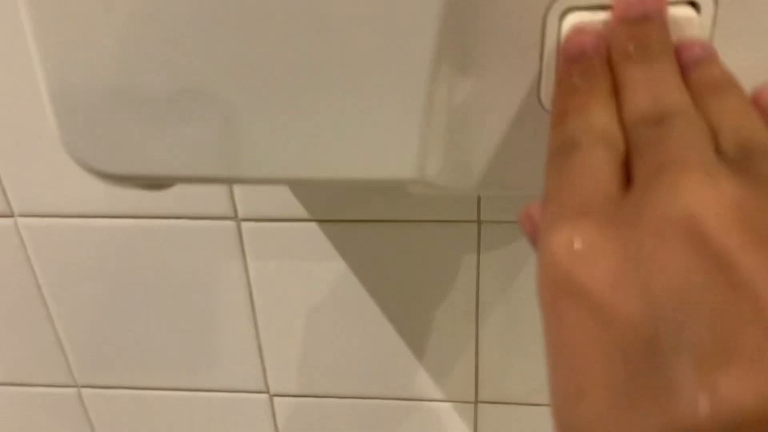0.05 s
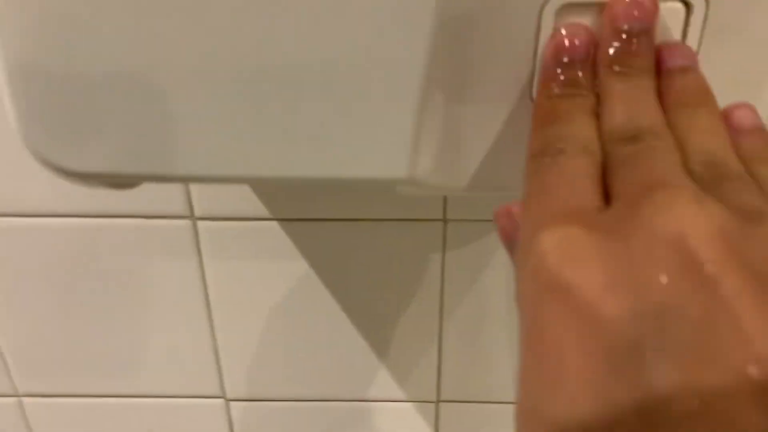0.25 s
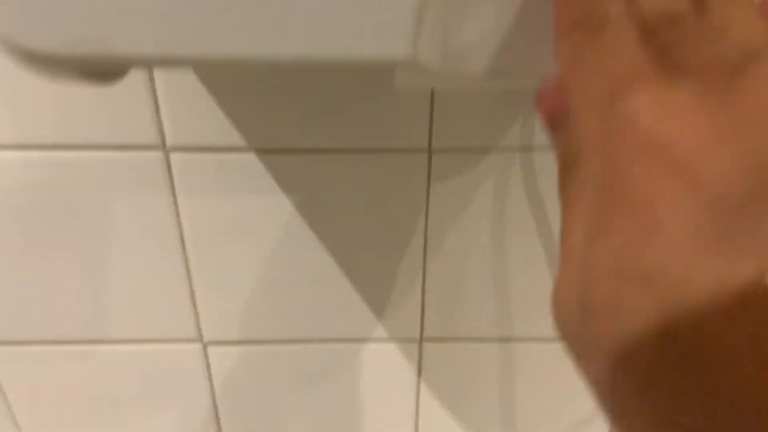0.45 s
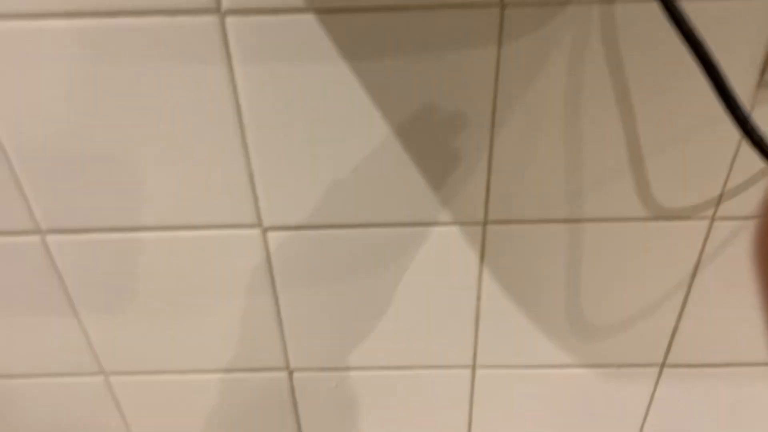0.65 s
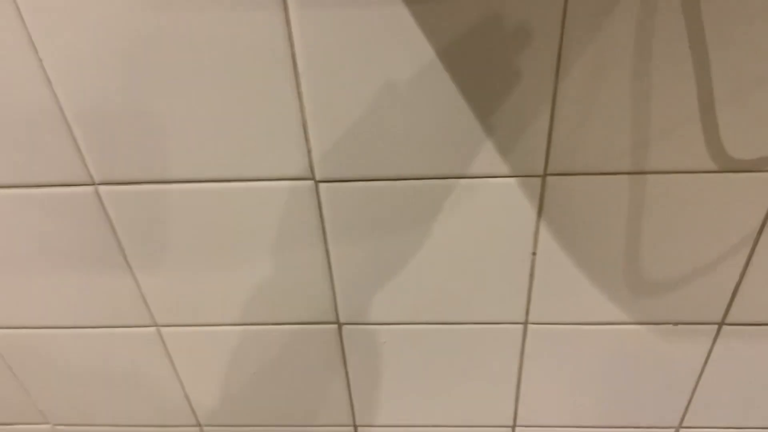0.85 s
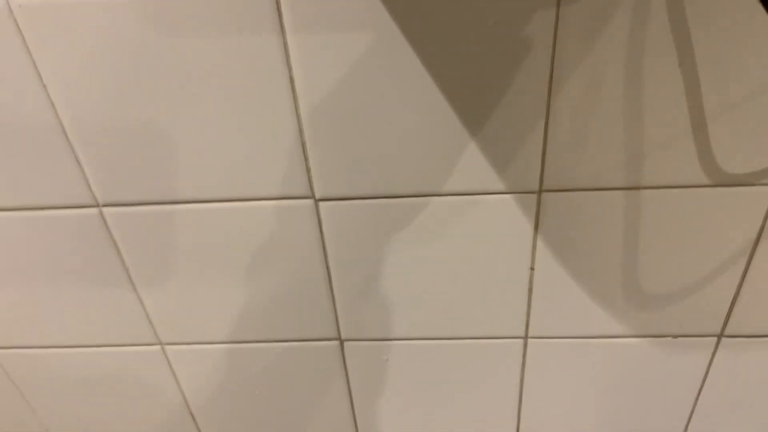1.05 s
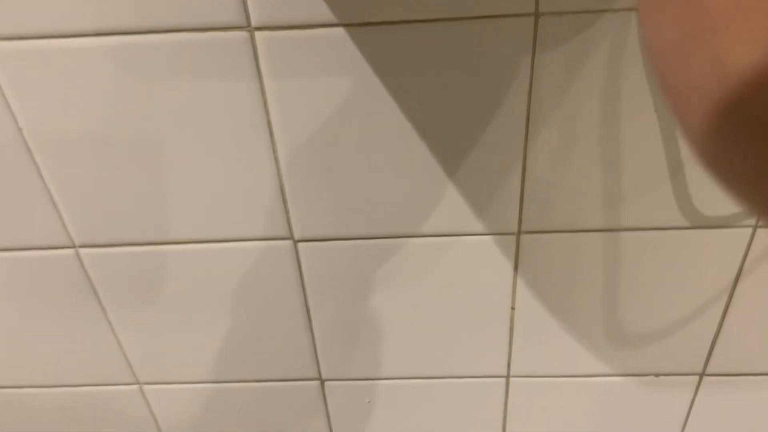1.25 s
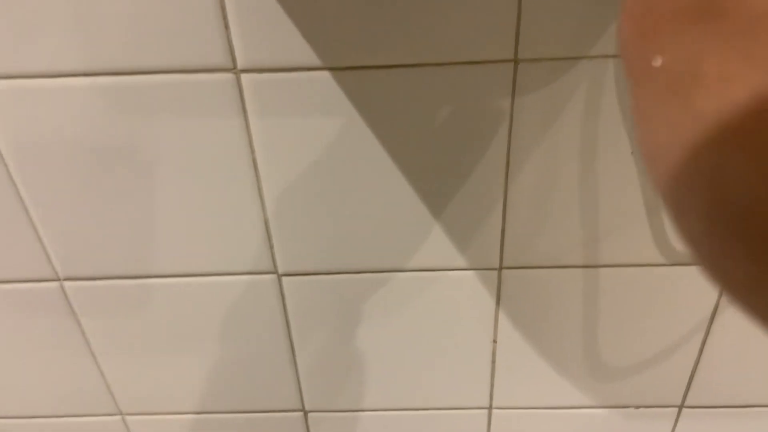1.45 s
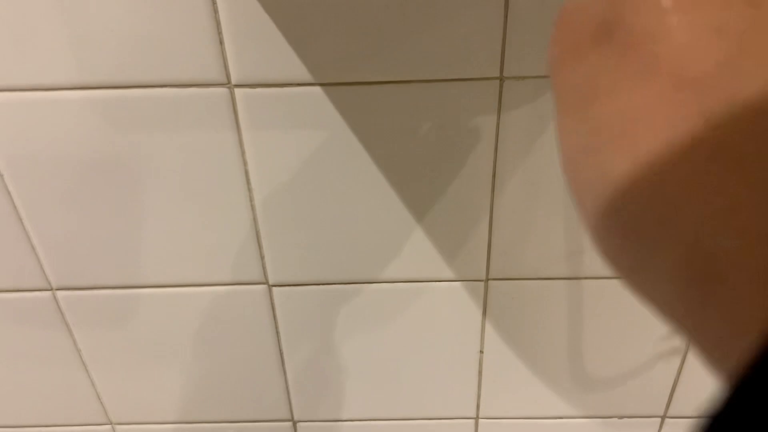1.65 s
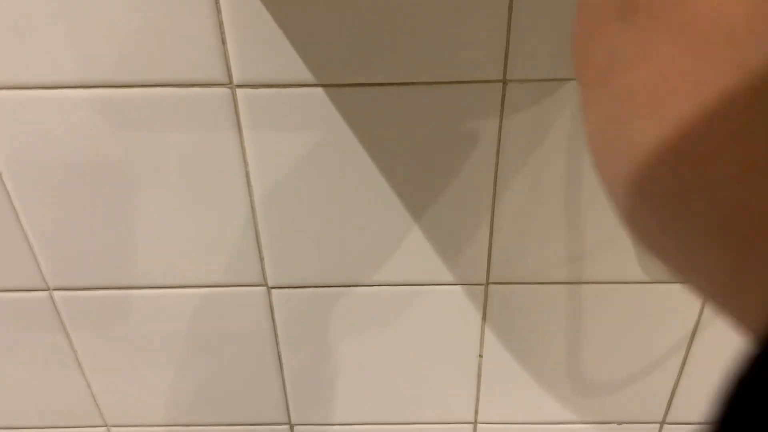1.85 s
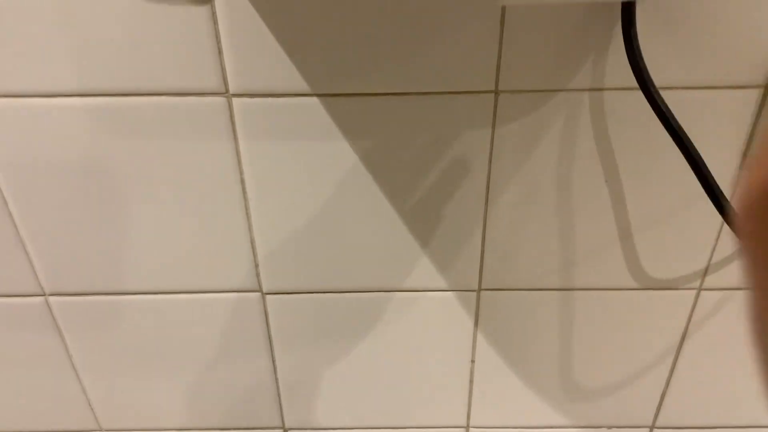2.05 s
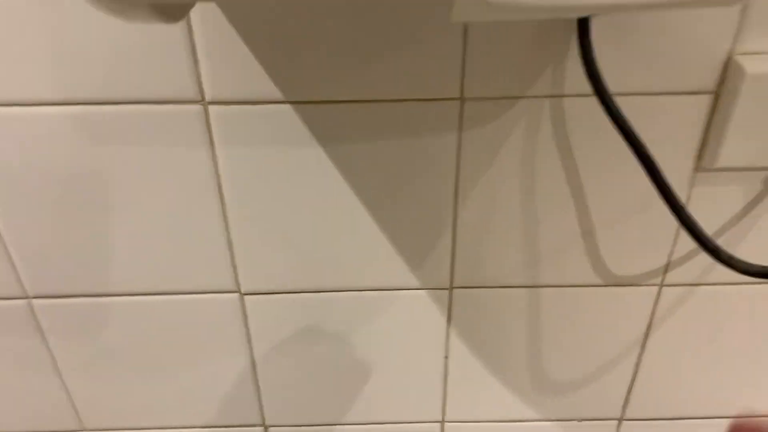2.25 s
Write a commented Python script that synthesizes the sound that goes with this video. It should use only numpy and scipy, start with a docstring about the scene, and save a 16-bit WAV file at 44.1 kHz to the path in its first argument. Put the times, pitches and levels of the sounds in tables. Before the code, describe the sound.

A wall switch clacks and snaps several times, pauses briefly, then clicks again in a quicker run. Fingers rub softly on the plastic over a low rumble. It is heard close up in a small, echoing tiled room.

```python
"""Fingers rub and tick on plastic over a low rumble; then a wall switch clacks and snaps, again and
again, close by in a small tiled room. The rocker strikes its hollow plate and the spring snaps over
brightly: each impact excites a crack, a dense rattle and the damped modes of the part. Sliding skin
makes a grainy hiss and one faint squeak. The tiles reverberate after every blow."""
import sys
import numpy as np
from scipy import signal
from scipy.fft import rfft, irfft
from scipy.io import wavfile
from scipy.ndimage import uniform_filter1d

SR = 44100
rng = np.random.default_rng(int(sys.argv[2]) if len(sys.argv) > 2 else 0)


def wav_out(sig):
    """Save sig, one row per channel (or a flat mono array), as 16-bit PCM at SR to the path in sys.argv[1]."""
    wavfile.write(sys.argv[1], SR, np.round(np.clip(np.atleast_2d(sig).T, -1, 1) * 32767).astype(np.int16))


N = 101429
BLOW_S = .005  # the level of a blow or tick is its energy spread over this time


def amp(db):
    """Amplitude ratio of a level in decibels."""
    return 10 ** (np.asarray(db) / 20)


def unit(x):
    """Normalisation to an rms of 1."""
    return x / np.sqrt(np.mean(x ** 2) + 1e-20)


def read(points, hz):
    """Interpolation on a logarithmic frequency axis."""
    f, value = np.transpose(points)
    return np.interp(np.log(hz + 1), np.log(f + 1), value)


def level(points):
    """Amplitude envelope from (time [s], level [dB]) points."""
    return amp(np.interp(np.arange(N) / SR, *np.transpose(points)))


def add(mix, s, sound):
    """Superposition: a stereo sound joins the mix at time s."""
    part = mix[:, max(round(s * SR), 0):][:, :sound.shape[1]]
    part += sound[:, :part.shape[1]]


def colour(x, points):
    """Minimum-phase filtering by a (frequency [Hz], gain [dB]) curve."""
    log_gain = np.log(amp(read(points, abs(np.fft.fftfreq(8192, 1 / SR)))))
    taps = np.fft.ifft(np.exp(np.conj(signal.hilbert(log_gain)))).real[:4096]
    return signal.fftconvolve(x, taps[None], axes=1)[:, :x.shape[1]]


def stereo_hiss(size):
    """Partial correlation: stereo hiss, centred in the bass and top treble, wide in between."""
    # how centred the hiss sounds: (frequency [Hz], left-right correlation [ratio])
    centring = [(20, .98), (300, .93), (500, .75), (800, .4), (1300, .1), (6000, .15), (9000, .3),
                (12000, .88), (16000, .93)]
    a, b = rfft(rng.standard_normal((2, size)))
    same = read(centring, np.fft.rfftfreq(size, 1 / SR))
    return irfft(np.array([a, same * a + np.sqrt(1 - same ** 2) * b]), size)


def direct(x, late_share=.72, lag_samples=4):
    """Path difference: most of a near sound reaches the right port later than the left."""
    delayed = np.pad(x, (lag_samples, 0))[:len(x)]
    return np.array([x, late_share * delayed + (1 - late_share) * x])


def dying(t60s, size):
    """Frequency-dependent damping: each band of a stereo noise falls 60 dB in its own T60."""
    hz, t, spectra = signal.stft(stereo_hiss(size), SR, nperseg=128)
    fade = amp(-60 * t / np.maximum(read(t60s, hz), .002)[:, None])
    return signal.istft(spectra * fade, SR, nperseg=128)[1][:, :size]


def ring(modes, size, detune=0, build_cycles=.88):
    """Free vibration: each mode is a damped sine that builds up over its first cycles."""
    t = np.arange(size) / SR
    return sum(amp(db - 60 * t / t60) * (1 - np.exp(-t * hz / build_cycles))
               * np.sin(2 * np.pi * hz * (1 + detune * rng.normal()) * t) for hz, db, t60 in modes)


def rumble(hum_hz=48.8):
    """Amplitude modulation: low rumble and hum, with a soft handling thump near 1.5 s."""
    # noise spectrum: (frequency [Hz], relative density [dB])
    spectrum = [(20, -52.5), (32, -20), (48, 4), (68, -5.5), (90, -5.5), (108, -20.5), (130, -10),
                (155, -16.5), (210, -10.5), (260, -35.5), (340, -28), (480, -32), (1000, -44.5),
                (2500, -58), (6000, -66), (8500, -57.5), (11000, -85), (16000, -76)]
    # level of rumble and hum, peaking at the thump: (time [s], gain [dB])
    envelope = [(0, 5), (.28, -3.5), (.42, 1.5), (.6, -1.5), (1.0, 0.5), (1.3, 1), (1.44, 6.5), (1.56, 6.5),
                (1.75, 4), (2.0, -1), (2.3, 1.5)]
    noise = irfft(rfft(stereo_hiss(N)) * amp(read(spectrum, np.fft.rfftfreq(N, 1 / SR))), N)
    hum = amp(-38) * np.sin(2 * np.pi * (hum_hz * np.arange(N) / SR + rng.random()))
    return level(envelope) * (amp(-35) * unit(noise) + hum)


def room(x, first_echo_s=.0018, early_t60_s=.21):
    """Reverberation: convolution with early reflections, a long tail and standing waves."""
    # decay of the tail: (frequency [Hz], T60 [s])
    tail_t60 = [(150, 1.56), (400, 0.78), (1000, 0.96), (2700, 0.8745), (5500, 0.65), (8500, 0.5857),
                (12000, 0.4), (16000, 2.41)]
    # spectrum of the tail: (frequency [Hz], gain [dB])
    tail_colour = [(100, -3), (300, -4.5), (500, 2), (800, -11), (1300, -11.5), (2500, -2), (4200, -9),
                   (5900, -5.5), (8300, -8), (12000, -10.5), (16000, -20.5)]
    # early echoes, thin in the bass: (frequency [Hz], gain [dB])
    early_colour = [(100, -18), (330, -13.5), (700, -2), (1500, -1), (4000, -2), (16000, 0.5)]
    # standing waves: (frequency [Hz], level [dB], T60 [s])
    modes = [(152.6, -70, 0.99), (213.2, -58, 0.67), (313.8, -53, 0.23), (335.8, -65, 0.84),
             (366.4, -64, 0.89), (389, -69.5, 2.1), (513.2, -69, 0.21), (786, -72.5, 0.69)]
    # treble loss of the whole response: (frequency [Hz], gain [dB])
    treble = [(100, 1), (11000, 0), (13500, -3.5), (15000, -10), (16000, -2.5)]
    onset = np.clip(np.arange(SR) / SR / first_echo_s - 1, 0, 1)
    tail = unit(dying(tail_t60, SR) * onset) / np.sqrt(SR)
    early = unit(dying([(1, early_t60_s)], SR) * onset) / np.sqrt(SR)
    response = colour(tail, tail_colour) + amp(-4.5) * colour(early, early_colour) + ring(modes, SR)
    return signal.fftconvolve(x, colour(response, treble), axes=1)[:, :N]


def rub(grain_db=4.0, grains_per_s=600):
    """Sliding friction of skin on plastic: a soft hiss with fine random impulses in it."""
    # strength of the rubbing: (time [s], level [dB])
    envelope = [(0, -35.5), (.08, -41.5), (.15, -39.5), (.19, -44.5), (.24, -30), (.33, -33), (.6, -48.5),
                (1.14, -77.5), (1.16, -54.5), (1.2, -32.5), (1.26, -36), (1.42, -45), (1.5, -45.5),
                (1.7, -43.5), (1.88, -35), (2.05, -62), (2.3, -50)]
    # friction spectrum: (frequency [Hz], relative level [dB])
    spectrum = [(100, -21.5), (330, 19.5), (500, 4.5), (1200, 0.5), (2200, -7.5), (4000, -12.5),
                (6000, -14.5), (8500, -7.5), (12000, -26.5), (16000, -36)]
    contacts = rng.random(N) < grains_per_s / SR
    strength = amp(grain_db * np.minimum(rng.exponential(1, N), 4))
    grains = contacts * strength * rng.choice([-1, 1], N)
    friction = unit(stereo_hiss(N)) + .54 * unit(direct(grains))
    return level(envelope) * unit(colour(friction, spectrum))


def squeak(length_s=.125, hz=3063, db=-55, rise_s=.008, fade_db_per_s=110):
    """Friction tone: a thin pitch and its octave waver and fade as the rub eases."""
    t = np.arange(0, length_s, 1 / SR)
    wobble, flutter = unit(uniform_filter1d(rng.standard_normal((2, N)), size=200))[:, :len(t)]
    phase = 2 * np.pi * np.cumsum(hz * (1 + .008 * wobble)) / SR
    tone = (np.sin(phase) + amp(-10) * np.sin(2 * phase)) * (1 + .3 * flutter)
    return direct(tone * np.minimum(t / rise_s, 1) * amp(db - fade_db_per_s * t))


def ticks(t60_s=.012, width_octaves=.25, skirt_db=-19):
    """Heavily damped resonance: each light touch is a noise burst with one broad spectral peak."""
    # fingers and plastic touch: (time [s], level [dB], centre frequency [Hz])
    touches = [(0.15, -44, 3400), (0.177, -42, 7700), (0.228, -38, 11800), (.2415, -39, 11900),
               (0.251, -28, 11500), (.905, -61.5, 4500), (.933, -68, 5000), (1.026, -58, 7840),
               (1.027, -56, 4080), (1.183, -38, 4000), (1.1847, -35.5, 10500), (1.1968, -37, 4000),
               (1.433, -43, 9600), (1.4415, -40.5, 8150), (1.448, -44, 10700), (1.4569, -33, 8150),
               (1.463, -38, 9800), (1.4651, -39.5, 4470), (1.5113, -24.5, 9300), (1.5125, -34, 4250)]
    out, hz = np.zeros((2, N)), np.geomspace(200, 16000, 40)
    for s, db, centre_hz in touches:
        peak = np.exp(-.5 * (np.log2(hz / centre_hz) / width_octaves) ** 2) + amp(skirt_db)
        burst = dying([(centre_hz, t60_s)], size=1024)
        tick = colour(burst, list(zip(hz, 20 * np.log10(peak))))
        add(out, s, amp(db) * tick * np.sqrt(BLOW_S * SR / np.sum(tick ** 2)))
    return out


def weighted(x, band_db):
    """Spectral weighting: a blow's energy in each of six bands is brought towards a given level."""
    # thud, knock, crack, ring, fizz and air bands: (centre frequency [Hz])
    centres = [280, 1100, 3500, 5900, 8800, 13000]
    # limits of those bands: (frequency [Hz])
    edges = [120, 480, 2200, 5000, 7200, 11000, 16000]
    power, hz = (abs(rfft(x)) ** 2).mean(0), np.fft.rfftfreq(x.shape[1], 1 / SR)
    energy = np.histogram(hz, edges, weights=power)[0] * 2 / x.shape[1]
    gain_db = np.array(band_db) - 10 * np.log10(energy / (BLOW_S * SR))
    return colour(x, list(zip(centres, gain_db)))


def blows(impacts, modes, spectrum, t60s, crack_db, rise_s, detune):
    """Impact excitation: each blow is a sharp crack, a dense short rattle and the part's modes."""
    out, size = np.zeros((2, N)), SR // 5
    t = np.arange(size) / SR
    crack = amp(crack_db) * direct(signal.unit_impulse(size))
    for s, *band_db in impacts:
        rattle = dying(t60s, size) * (1 - np.exp(-t / rise_s))
        blow = colour(crack + rattle, spectrum) + direct(ring(modes, size, detune))
        add(out, s, weighted(blow, band_db))
    return out


def plate_clacks():
    """Plate vibration: the rocker or a finger strikes the hollow plate and excites its modes."""
    # strikes: (time [s], level [dB] in each band: thud, knock, crack, ring, fizz, air)
    impacts = [(.193, -18.5, -48, -39.5, -54, -67, -63), (.213, -19, -43, -39, -55, -54, -69.5),
               (.2508, -18, -17.5, -26.5, -34, -23, -42), (.2735, -12, -24.5, -40, -23, -31, -42.5),
               (.437, -26, -33, -44, -46, -74, -66), (.4675, -37, -16, -22.5, -57, -26.5, -31.5),
               (.4738, -8, -14.5, -27, -36, -34.5, -54), (1.154, -28, -47, -77, -72, -80, -82),
               (1.2078, -12.5, -20, -24, -24.5, -39.5, -33.5), (1.2112, -16.5, -32.5, -29, -27, -30, -33),
               (1.477, -28.5, -35, -46.5, -50, -44, -58), (1.526, -48, -32.5, -35.5, -56, -60, -58),
               (1.597, -25.5, -36, -32, -58, -58, -54), (1.6055, -20, -32, -35.5, -24.5, -33, -40),
               (1.792, -15, -29, -35, -45, -58, -74), (1.8033, -13.5, -21.5, -20.5, -23, -21, -36),
               (1.875, -20.5, -34, -65, -62, -68, -49), (1.938, -7.5, -19, -28.5, -37, -43, -30.5),
               (2.145, -33.5, -41, -68, -76, -83, -88)]
    # plate modes: (frequency [Hz], relative level [dB], T60 [s])
    modes = [(171.3, -17, 0.11), (245.6, -10.5, 0.056), (300.4, -13.5, 0.1), (339.2, -5.5, 0.058),
             (380.7, -19.5, 0.073), (502.5, -13.5, 0.072), (827.5, -12, 0.14), (1125.3, -5, 0.11),
             (1290, -6, 0.035), (1378, -5, 0.036), (1538, -12, 0.029), (1780, -20.5, 0.029),
             (4540, -7, 0.0075), (5570, -28.5, 0.09), (5960, -14.5, 0.031)]
    # spectrum of crack and rattle: (frequency [Hz], gain [dB])
    spectrum = [(100, -28), (300, -8), (700, 13.5), (1300, 17.5), (2100, 1), (3500, -6), (6000, -3),
                (9000, -6.5), (12500, -9.5), (16000, -17.5)]
    # decay of the rattle: (frequency [Hz], T60 [s])
    t60s = [(200, 0.027), (1200, 0.024), (3000, 0.03), (6000, 0.0082), (14000, .014)]
    return blows(impacts, modes, spectrum, t60s, crack_db=16, rise_s=.0005, detune=.012)


def spring_snaps():
    """Snap-through: the spring flips over and releases its elastic energy as bright ringing."""
    # snaps: (time [s], level [dB] in each band: thud, knock, crack, ring, fizz, air)
    impacts = [(.447, -12.5, -21.5, -35.5, -30, -16.5, -23.5), (1.5478, -27.5, -28, -37, -30.5, -27.5, -19),
               (1.7478, -27, -22.5, -34.5, -33.5, -27, -24), (1.9048, -22.5, -23, -33, -30, -22, -29.5)]
    # spring modes: (frequency [Hz], relative level [dB], T60 [s])
    modes = [(335.5, -17.5, 0.19), (795, -13, 0.072), (2535, -11.5, 0.12), (4010, 6, .03),
             (5520, -38, .025), (6290, -11.5, 0.044), (8156, 5.5, 0.03), (8390, -3.5, 0.034),
             (8800, -7.5, 0.0052), (12170, 1.5, 0.016), (14950, -12.5, .025)]
    # spectrum of crack and rattle: (frequency [Hz], gain [dB])
    spectrum = [(100, -39.5), (700, -1.5), (2000, -5.5), (4000, 4.5), (6000, 7.5), (9000, 8.5), (12500, 10),
                (16000, 13)]
    # decay of the rattle: (frequency [Hz], T60 [s])
    t60s = [(200, 0.023), (2000, 0.083), (8000, 0.031), (15000, 0.0094)]
    return blows(impacts, modes, spectrum, t60s, crack_db=6, rise_s=.0012, detune=.004)


def scene():
    """Superposition of the direct sound of switch and hand, the reverberation and the rumble."""
    # small parts radiate little bass: (frequency [Hz], gain [dB])
    radiation = [(20, -36), (60, -25), (120, -13), (180, -1.5), (16000, -2)]
    switch = colour(plate_clacks() + spring_snaps(), radiation)
    fingers = ticks()
    add(fingers, 1.037, squeak())
    return switch + fingers + room(switch + amp(-5) * fingers) + rub() + rumble()


def record(dry, fade_s=.002, cutoff_hz=15900):
    """Frequency response: each microphone port colours the sound; soft ends and a low-pass follow."""
    # response of each port: (frequency [Hz], gain [dB])
    left_port = [(50, 1), (1000, 1), (6300, 1), (6700, -3), (7000, -12), (7450, -16), (7800, -7), (8100, 3),
                 (9300, 3), (11000, 0), (16000, -1)]
    right_port = [(50, -1.3), (1000, -1), (6300, -.5), (6700, -3), (7000, -12), (7450, -17), (7800, -11),
                  (8100, -3), (9300, -3), (11000, 0), (16000, -1)]
    ports = np.vstack([colour(dry[:1], left_port), colour(dry[1:], right_port)])
    ports = ports * signal.windows.tukey(N, 2 * fade_s * SR / N)
    lowpass = signal.firwin(201, cutoff_hz, window=("kaiser", 9), fs=SR)
    return signal.oaconvolve(ports, lowpass[None], "same")


dry = scene()
out = record(dry)
wav_out(out)
```